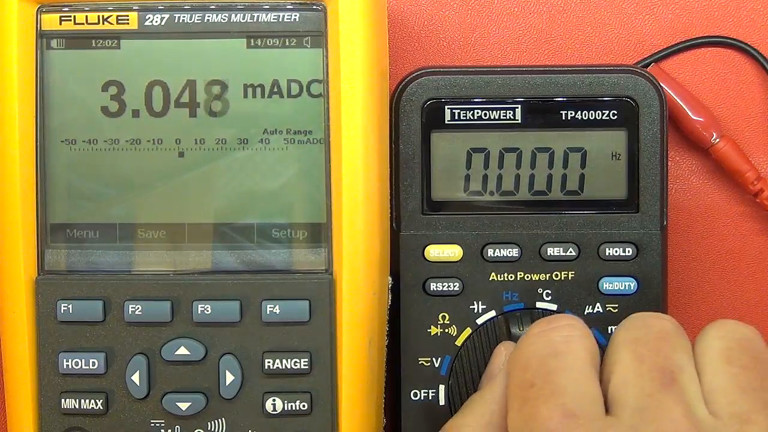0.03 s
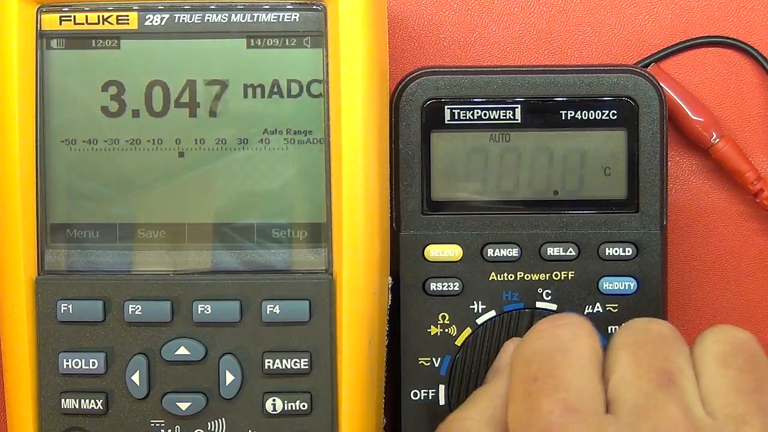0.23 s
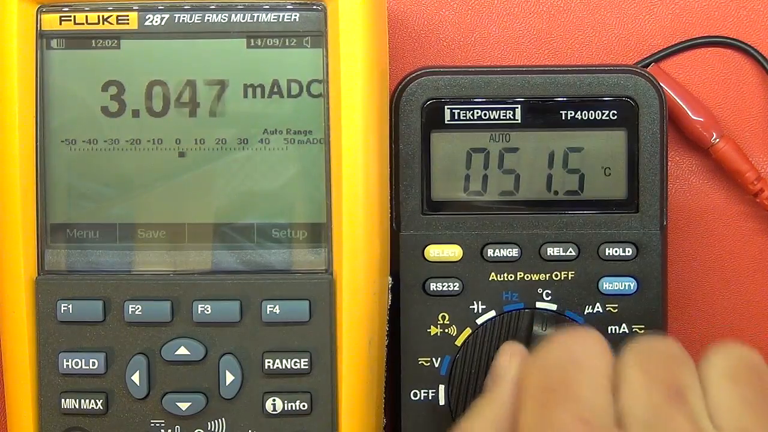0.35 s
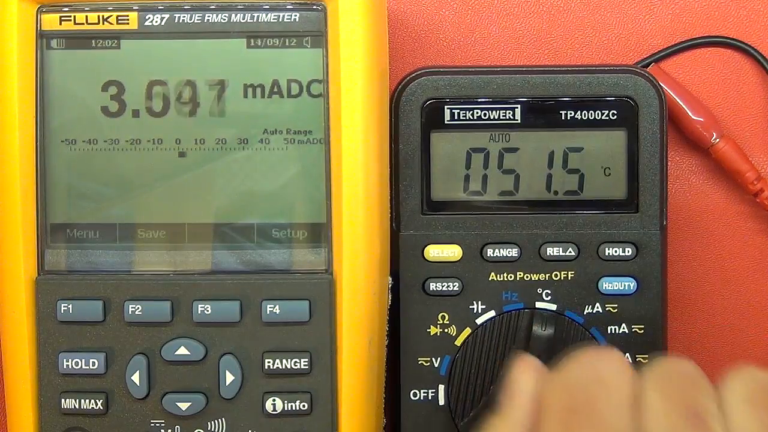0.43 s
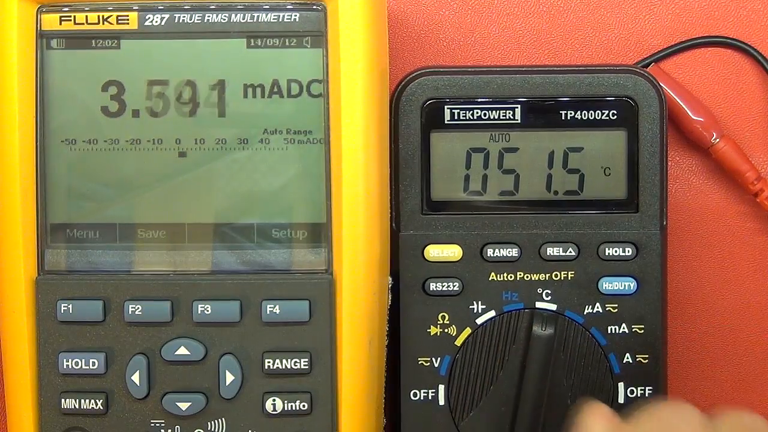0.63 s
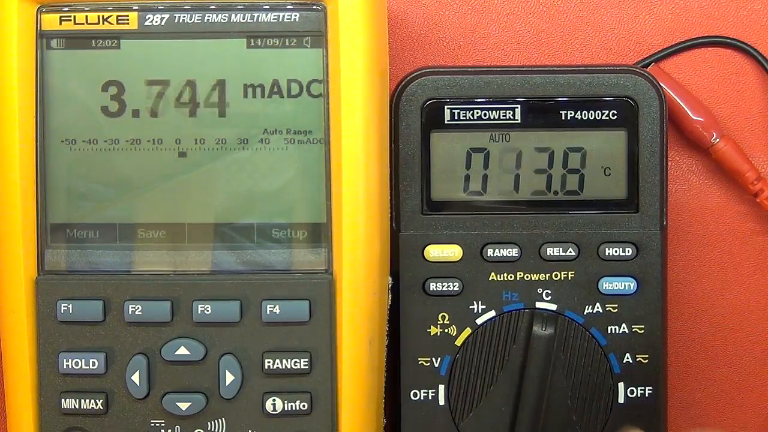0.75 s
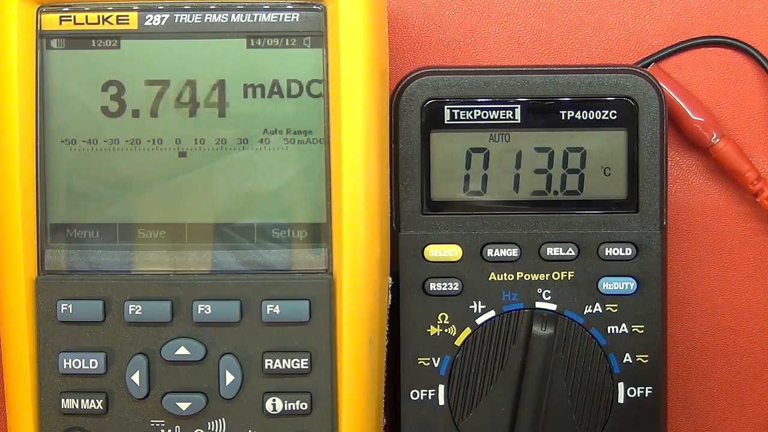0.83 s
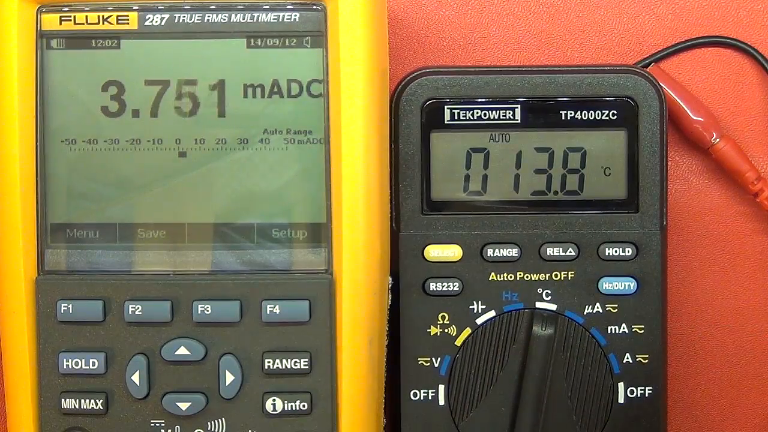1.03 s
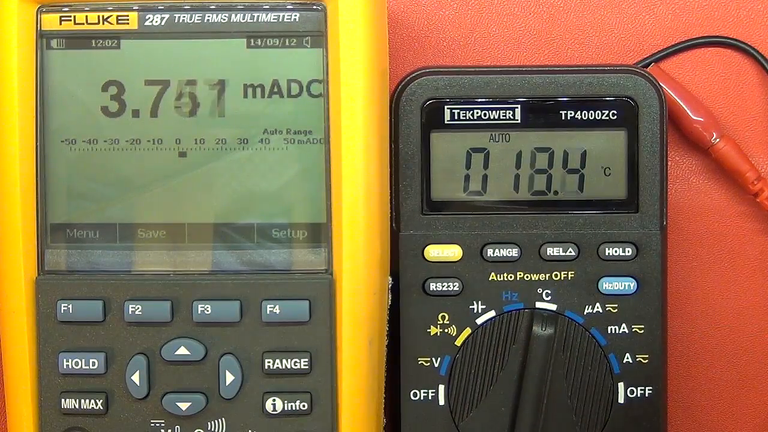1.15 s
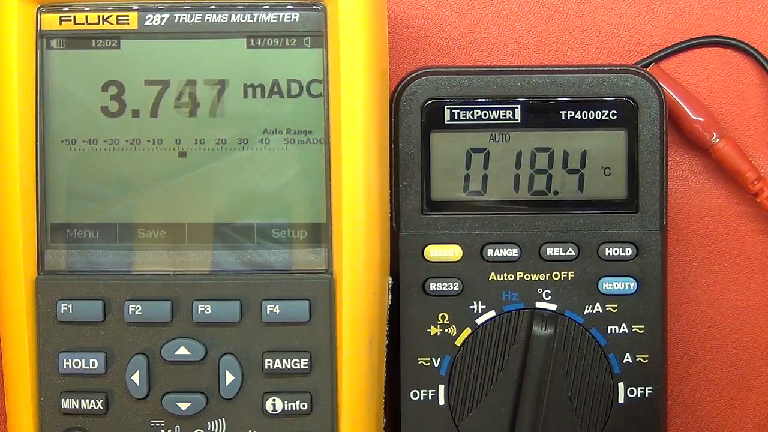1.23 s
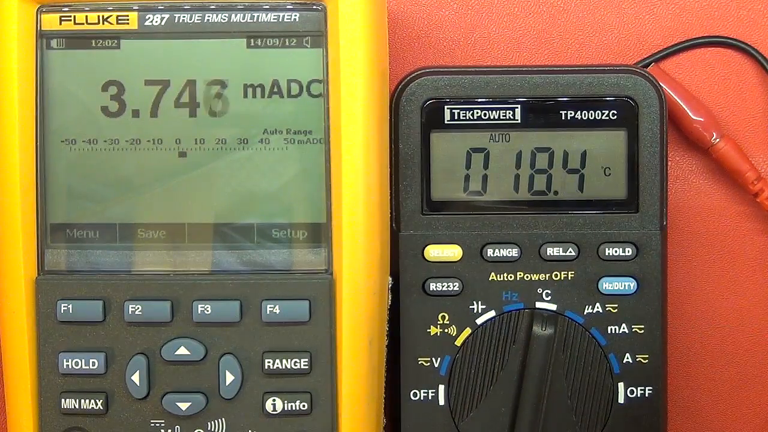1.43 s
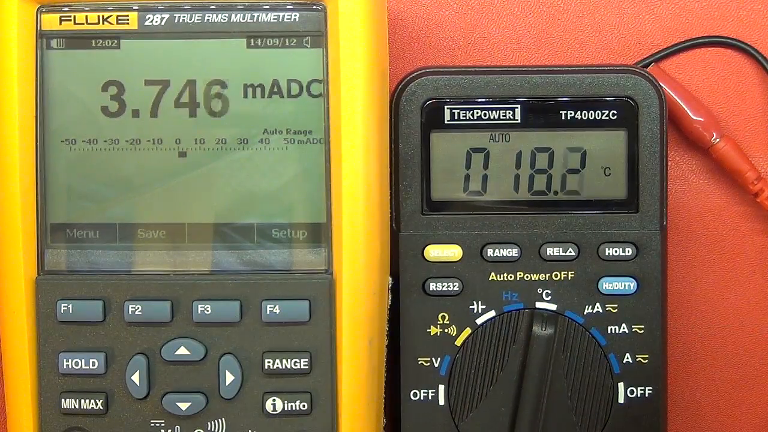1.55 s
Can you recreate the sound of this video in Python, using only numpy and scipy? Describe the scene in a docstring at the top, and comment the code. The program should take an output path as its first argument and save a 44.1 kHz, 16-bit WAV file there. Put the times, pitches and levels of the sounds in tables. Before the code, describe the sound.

A multimeter's rotary selector knob clicks sharply one step, with a springy plastic ring and quiet hiss.

```python
"""A click of a multimeter's selector knob

A hand turns the rotary selector of a plastic multimeter one step, on a workbench in a small room.
The detent scrapes up its ramp (noise bursts) and snaps home: the case and spring ring as fading sine
tones, the case and room as fading noise, and the meter thumps softly on its mat.
The knob knocks as the fingers let go, then once more very faintly; later come a few thin ticks.
Behind it all lie quiet noise hiss, a flickering whirr and steady electrical tones."""
import sys
import numpy as np
from scipy import signal
from scipy.fft import rfft, irfft
from scipy.io import wavfile

SR = 44100
rng = np.random.default_rng(int(sys.argv[2]) if len(sys.argv) > 2 else 0)


def dump_mix(stems):
    """Bounce the given channels to the path in sys.argv[1] as a 16-bit WAV at rate SR."""
    frames = np.atleast_2d(stems).T  # one column per channel
    limited = np.clip(frames, -1, 1)  # hard clip at full scale
    pcm = np.round(limited * 32767).astype(np.int16)
    wavfile.write(sys.argv[1], SR, pcm)


N = 70560
TIME = np.arange(N) / SR
FREQS = np.maximum(np.fft.rfftfreq(N, 1 / SR), 1)  # at least 1 Hz, so the logarithm exists

# the detent lands and bounces: (time [s], level [dB], treble edge [Hz])
LANDINGS = [(0.2125, -5.5, 14000), (0.2135, -9, 15000), (.2133, -1.5, 14000), (0.2135, -7, 11000),
            (.2170, 3, 6000)]
# ringing tones of the plastic case: (frequency [Hz], level [dB], time to fall 60 dB [s])
CASE_TONES = [(552, -50, 0.26), (1152, -48.5, 0.11), (1920, -37.5, 0.041), (2510, -29.5, .02),
              (2660, -30, 0.031), (4090, -23, 0.0094), (4970, -32, 0.032), (7000, -25.5, 0.01),
              (8580, -19.5, .011), (9400, -25, .011), (11780, -13.5, 0.0097), (13100, -15, .007)]
CASE_LOW_HZ = 430  # the small case radiates little bass
# crack of the snap: (frequency [Hz], level [dB per Hz])
CRACK_COLOUR = [(200, -95), (1000, -82.5), (1800, -73), (3000, -67), (8500, -53.5), (13000, -53.5),
                (16000, -63)]
SNAP_S, CRACK_T60_S = 0.2129, 0.022  # a T60 is the time to fall by 60 dB
# long tones of the spring: (frequency [Hz], level [dB], time to fall 60 dB [s])
SPRING_TONES = [(1025, -58.5, 2), (1504, -51, 0.9), (1556, -59, 1.15), (2096, -54, 0.13), (2275, -41, 0.36),
                (2400, -35.5, 0.25), (2778, -36.5, 0.26), (3250, -51, 0.94), (4004, -54, 0.94),
                (4245, -40.5, .33), (4606, -58.5, 1.3), (6021, -49, 0.14), (6161, -41.5, 0.38)]

# ring of case and room after the snap: (frequency [Hz], level [dB per Hz])
RING_COLOUR = [(40, -90), (130, -85), (220, -83.5), (460, -84), (552, -63), (640, -71.5), (760, -69.5),
               (880, -81.5), (1120, -72), (1350, -75), (1750, -72.5), (1900, -64.5), (2400, -65),
               (3200, -68.5), (4200, -65.5), (5600, -68), (6100, -64), (8500, -64), (10500, -67),
               (13000, -69.5), (16000, -80)]
# how long that ring lasts: (frequency [Hz], time to fall 60 dB [s])
RING_T60 = [(150, 0.55), (600, 0.25), (1200, 0.22), (2500, 0.31), (5000, 0.28), (9000, 0.24), (15000, 0.18)]
RING_BUILD_S, RING_HOLD_S = 0.001, 0.025
# faint metallic afterglow: (frequency [Hz], level [dB per Hz])
AFTERGLOW_COLOUR = [(300, -110), (1000, -85.5), (3000, -93), (5000, -89.5), (9000, -94), (16000, -108)]
AFTERGLOW_T60_S = 1.0

# the detent slips on its ramp: (time [s], level [dB], treble edge [Hz])
SLIPS = [(0.1866, 0, 3480), (0.1896, -2, 4530), (0.1921, 5.5, 3020), (0.1964, -1.5, 3500),
         (0.2049, 1, 4460), (0.2069, 4, 7400)]
# colour of a slip: (frequency [Hz], level [dB per Hz])
SLIP_COLOUR = [(100, -112), (400, -99), (560, -69), (850, -82.5), (1120, -71.5), (1550, -87.5),
               (2500, -78.5), (5000, -86.5), (9000, -75.5), (16000, -78)]
SLIP_T60_S = 0.06

# the meter rocks on its mat: (time [s], frequency [Hz], level [dB], time to fall 60 dB [s])
THUMPS = [(0.227, 143.3, -49.5, 0.23), (0.236, 81, -57, 0.13)]

# the knob knocks in its play: (time [s], level [dB])
KNOCKS = [(0.461, -2), (0.52, -23)]
# ringing tones of the knob: (frequency [Hz], level [dB], time to fall 60 dB [s])
KNOB_TONES = [(559, -38.5, 0.087), (3180, -40, 0.0047), (722, -57, 0.12), (4860, -45.5, 0.0093),
              (1924, -44, 0.042), (7900, -41.5, 0.01), (8440, -38.5, 0.0032)]
# contact noise of a knock: (frequency [Hz], level [dB per Hz])
KNOCK_COLOUR = [(150, -102), (600, -70.5), (2000, -78), (5000, -90), (10000, -91), (16000, -105)]
KNOCK_T60_S, KNOB_ROOM_DB = 0.035, -8.5

# thin ticks on the bench: (time [s], level [dB], pitch [Hz])
TICKS = [(1.3718, -38.5, 8950), (1.3870, -21.5, 8530), (1.4218, -20, 6500), (1.502, -42, 10500),
         (1.5200, -41, 8600)]
TICK_T60_S, TICK_GRIT_DB, TICK_ROOM_DB = 0.0015, -12, -13.5
REBOUND_S, REBOUND_DB = 0.00085, -1.5
TICK_RING_T60_S, TICK_RING_DB = 0.035, -11
TICK_TOP_HZ = 11900
TICK_LOW_SHARE = 0.73  # a tick is cut steeply below this share of its pitch

# background hiss: (frequency [Hz], level [dB per Hz])
HISS_COLOUR = [(20, -100), (50, -85), (90, -87), (150, -92), (400, -94), (950, -100), (1080, -96),
               (1300, -100.5), (2200, -102.5), (4400, -106), (8000, -107.5), (16000, -109.5)]
# faint flickering bands in the hiss: (centre [Hz], width [Hz], middle level [dB rms])
WHIRR = [(2516, 240, -77.5), (2810, 165, -73), (3523, 230, -77.5), (3726, 290, -74.5)]
WHIRR_FLICKER_DB, WHIRR_FLICKER_HZ = 2.6, 24  # largest swing up or down; fastest flicker
# steady electrical tones: (frequency [Hz], level [dB rms])
HUM = [(100, -71.5), (15625, -77.5)]

ROOM_T60_S = 0.22
# how alike left and right are: 0 = unrelated, 1 = the same
NEAR_LIKENESS, KNOCK_LIKENESS, RING_LIKENESS, HISS_LIKENESS = 0.97, 0.68, 0.76, 0.7
BASS_ALIKE_HZ = 220  # below this the two sides grow more alike
NEAR_PAN_DB, RING_PAN_DB, HISS_PAN_DB = -3.5, -3, -4  # left minus right
CUTOFF_HZ = 16000


def amp(db):
    """Turn decibels into a plain multiplier."""
    return 10 ** (np.asarray(db) / 20)


def at_freqs(points):
    """Read a (frequency, value) table at every frequency, along a logarithmic pitch scale."""
    hz, value = np.transpose(points)
    return np.interp(np.log(FREQS), np.log(hz), value)


def fade(t60):
    """Die away smoothly from time zero, by 60 dB every t60 seconds."""
    return amp(-60 * TIME / t60)


def start_at(s, x):
    """Put silence in front of a sound so that it starts at its moment."""
    silence = np.zeros(x.shape[:-1] + (int(s * SR),))
    return np.concatenate([silence, x], axis=-1)[..., :N]


def edge(x, hz, kind, order=2):
    """Keep what lies below ("low") or above ("high") a frequency."""
    sos = signal.butter(order, min(hz, 0.45 * SR), kind, fs=SR, output="sos")
    return signal.sosfilt(sos, x + 1e-18)  # the tiny offset is inaudible


def pan(db):
    """Left and right multipliers for a level difference."""
    return amp(np.array([[db], [-db]]) / 2)


def stereo_noise(likeness):
    """White noise partly shared by the two sides, and more so in the bass."""
    mid, side = rng.standard_normal((2, N))
    likeness = np.clip(likeness, 0, 1)
    shared = np.sqrt((1 + likeness) / 2) * mid
    opposed = np.sqrt((1 - likeness) / 2) * edge(side, BASS_ALIKE_HZ, "high", order=1)
    return shared + opposed * np.array([[1], [-1]])


def coloured(spectrum, likeness):
    """Stereo noise shaped by a table of levels in dB per Hz."""
    shaped = rfft(stereo_noise(likeness)) * amp(at_freqs(spectrum))
    return irfft(shaped, N) * np.sqrt(SR / 2)  # make the levels count per Hz


def struck(modes):
    """A body struck at time zero rings in fading sines, with alternating signs."""
    out = 0
    for k, (hz, db, t60) in enumerate(modes):
        out = out + (-1) ** k * amp(db) * fade(t60) * np.sin(2 * np.pi * hz * TIME)
    return out


def room(x):
    """Blurred reflections of a small sound: blend it with fading noise of unit energy."""
    echoes = stereo_noise(RING_LIKENESS) * fade(ROOM_T60_S) * (1 - np.exp(-TIME / RING_BUILD_S))
    echoes = echoes / np.sqrt(np.sum(echoes ** 2) / 2)
    return signal.fftconvolve(x[None], echoes, axes=1)[:, :N]


def snap():
    """The detent hits the case several times, with a crack, and sets the spring singing."""
    case = struck(CASE_TONES)
    blows = sum(start_at(s, amp(db) * edge(case, hz, "low")) for s, db, hz in LANDINGS)
    crack = coloured(CRACK_COLOUR, NEAR_LIKENESS) * fade(CRACK_T60_S)
    crack_and_spring = start_at(SNAP_S, crack + struck(SPRING_TONES))
    return edge(blows + crack_and_spring, CASE_LOW_HZ, "high")


def snap_ring():
    """Crowded resonances of case and room build, hold briefly and die, each range at its own pace."""
    dense = rfft(coloured(RING_COLOUR, RING_LIKENESS))
    centres, t60s = np.transpose(RING_T60)
    out = 0
    # each band is full at its own centre and fades out towards its neighbours
    for band, t60 in zip(np.eye(len(centres)), t60s):
        share = at_freqs(np.column_stack([centres, band]))
        envelope = np.minimum(1, fade(t60) * amp(60 * RING_HOLD_S / t60))  # flat, then falling
        out = out + irfft(dense * share, N) * envelope
    out = out + coloured(AFTERGLOW_COLOUR, RING_LIKENESS) * fade(AFTERGLOW_T60_S)
    return start_at(SNAP_S, out * (1 - np.exp(-TIME / RING_BUILD_S)))


def ramp():
    """The detent scrapes uphill in short gritty slips of noise, the last one the brightest."""
    out = 0
    for s, db, hz in SLIPS:
        slip = coloured(SLIP_COLOUR, NEAR_LIKENESS) * fade(SLIP_T60_S)
        out = out + start_at(s, amp(db) * edge(slip, hz, "low"))
    return out


def rocking():
    """The meter recoils on its mat in soft low thumps, each one fading sine."""
    return sum(start_at(s, edge(struck([(hz, db, t60)]), 2 * hz, "low")) for s, hz, db, t60 in THUMPS)


def knob_release():
    """The knob settles in its play with soft hollow knocks: ringing tones plus contact noise."""
    contact = coloured(KNOCK_COLOUR, KNOCK_LIKENESS)[0] * fade(KNOCK_T60_S)  # one side only
    knock = struck(KNOB_TONES) + contact
    knocks = sum(start_at(s, amp(db) * knock) for s, db in KNOCKS)
    return knocks + amp(KNOB_ROOM_DB) * room(knocks)


def ticks():
    """Tiny hard contacts, each with one rebound and a short bright ring."""
    out = 0
    for s, db, hz in TICKS:
        grit = amp(TICK_GRIT_DB) * rng.standard_normal(N)
        ping = fade(TICK_T60_S) * (np.sin(2 * np.pi * hz * TIME) + grit)
        rebound = amp(REBOUND_DB) * start_at(REBOUND_S, ping)
        b, a = signal.iirpeak(hz, 1.6, fs=SR)  # a broad peak at the pitch
        ring = signal.lfilter(b, a, rng.standard_normal(N)) * fade(TICK_RING_T60_S)
        tick = ping + rebound + amp(TICK_RING_DB) * ring
        thin_tick = edge(tick, TICK_LOW_SHARE * hz, "high", order=6)
        out = out + amp(db) * start_at(s, thin_tick)
    out = edge(out, TICK_TOP_HZ, "low")
    return out + amp(TICK_ROOM_DB) * room(out)


def whirr():
    """Narrow bands of noise whose levels flicker together."""
    flicker = edge(rng.standard_normal(N), WHIRR_FLICKER_HZ, "low")
    swing_db = WHIRR_FLICKER_DB * np.tanh(2 * flicker / flicker.std())
    out = 0
    for hz, width, db in WHIRR:
        limits = [hz - width / 2, hz + width / 2]
        sos = signal.butter(2, limits, "band", fs=SR, output="sos")
        band = signal.sosfilt(sos, stereo_noise(HISS_LIKENESS))
        out = out + band / band.std() * amp(db + swing_db)
    return out


def hum():
    """Steady electrical sine tones, one low and one very high."""
    return sum(np.sqrt(2) * amp(db) * np.sin(2 * np.pi * hz * TIME) for hz, db in HUM)


def background():
    """Steady noise hiss with the whirr and the electrical tones in it."""
    return coloured(HISS_COLOUR, HISS_LIKENESS) + whirr() + hum()


def scene():
    """Add up the layers, all a little to the right."""
    near = snap() + ramp() + rocking() + knob_release()
    ringing = snap_ring() + ticks()
    return pan(NEAR_PAN_DB) * near + pan(RING_PAN_DB) * ringing + pan(HISS_PAN_DB) * background()


def record(dry):
    """Cut the top of the treble steeply."""
    sos = signal.ellip(10, 0.1, 75, CUTOFF_HZ, fs=SR, output="sos")
    return signal.sosfilt(sos, dry)


dry = scene()
out = record(dry)
dump_mix(out)
```